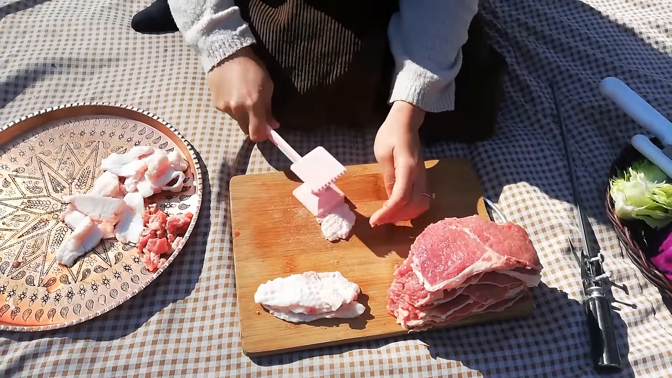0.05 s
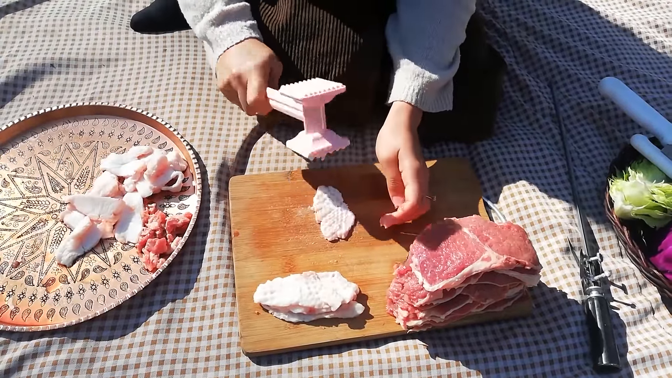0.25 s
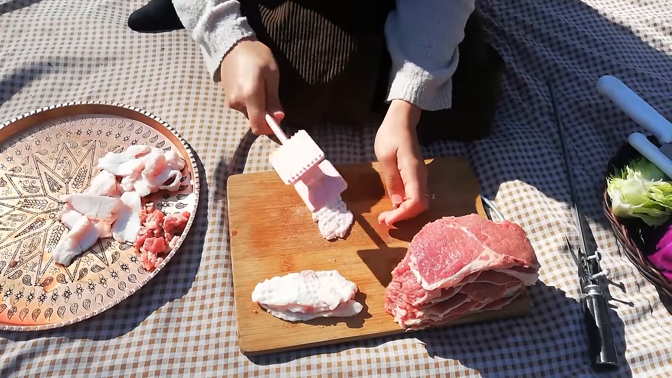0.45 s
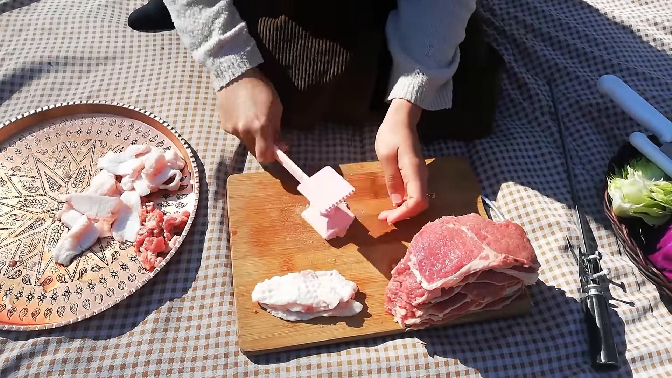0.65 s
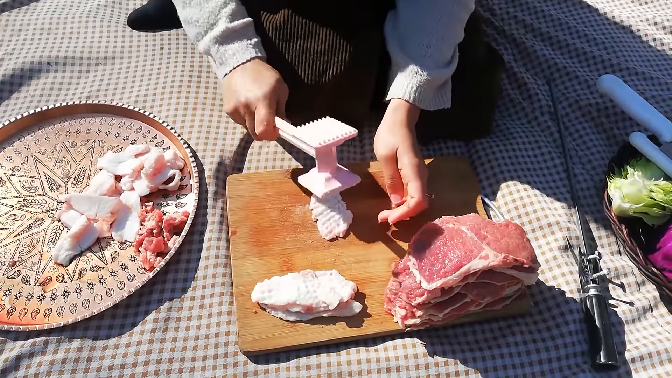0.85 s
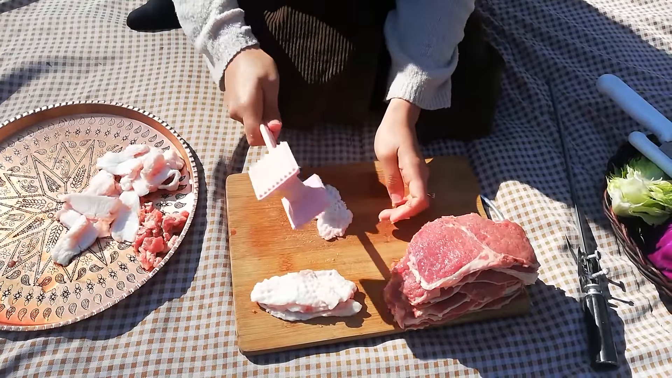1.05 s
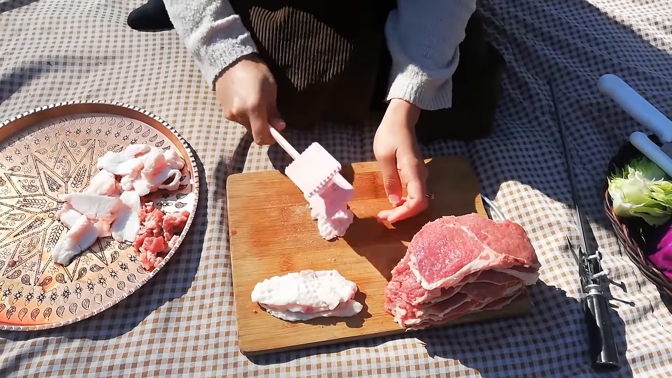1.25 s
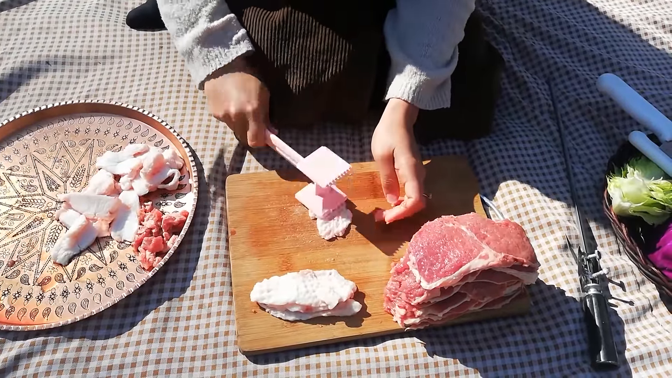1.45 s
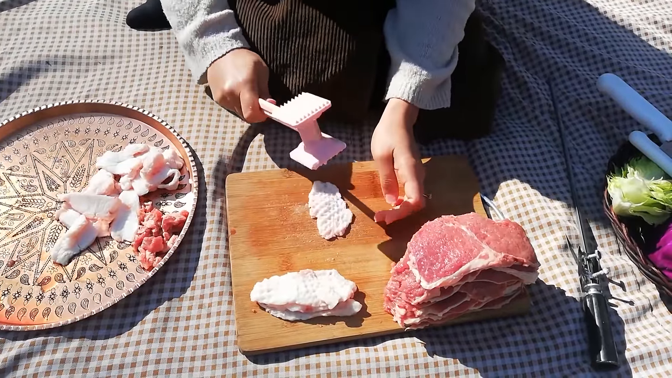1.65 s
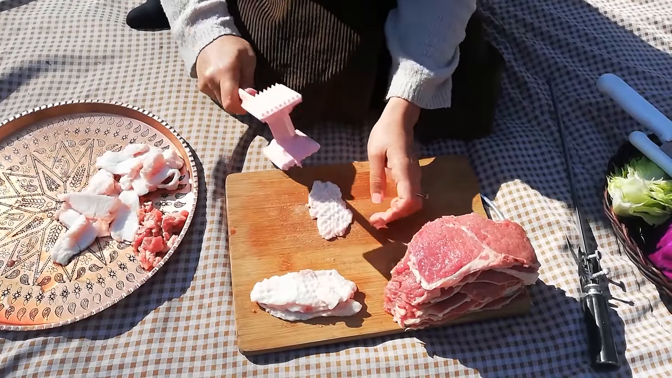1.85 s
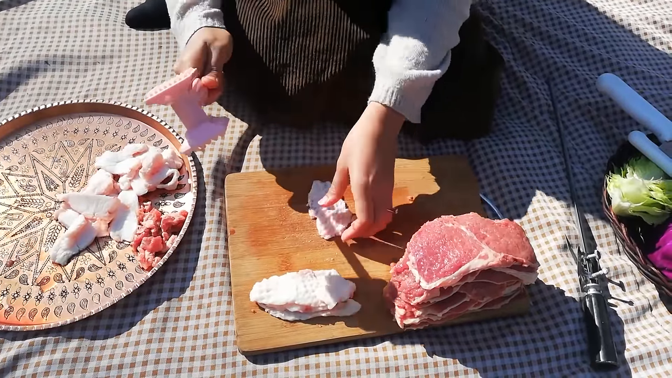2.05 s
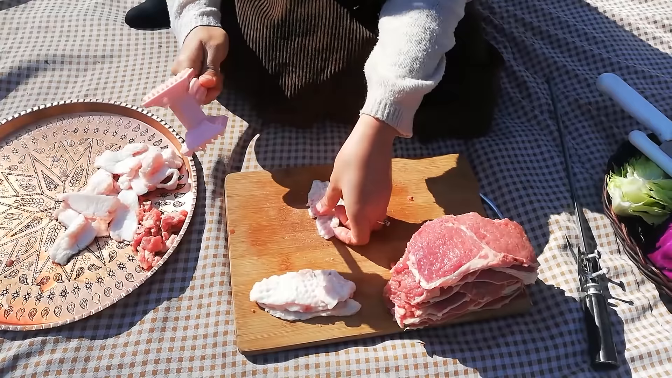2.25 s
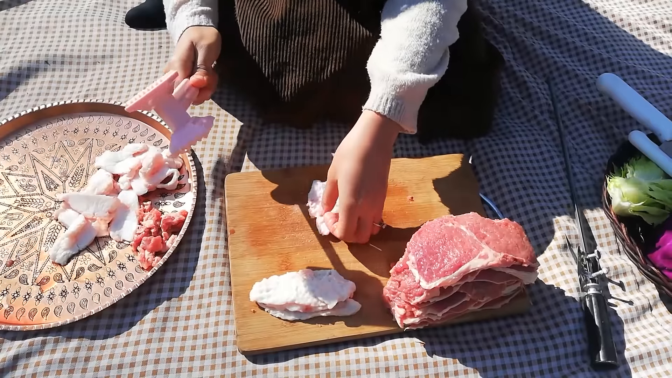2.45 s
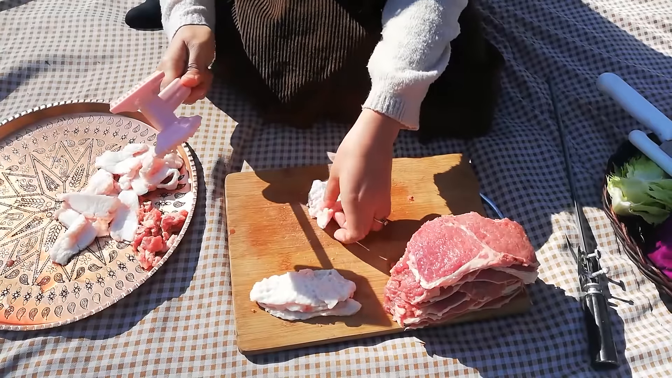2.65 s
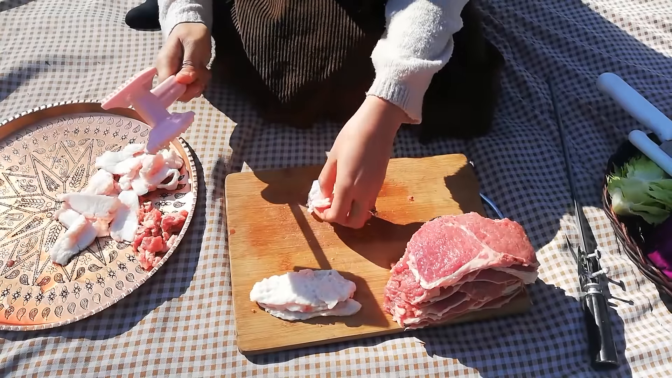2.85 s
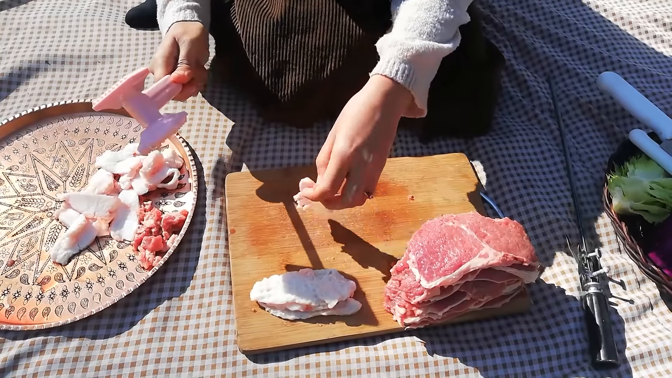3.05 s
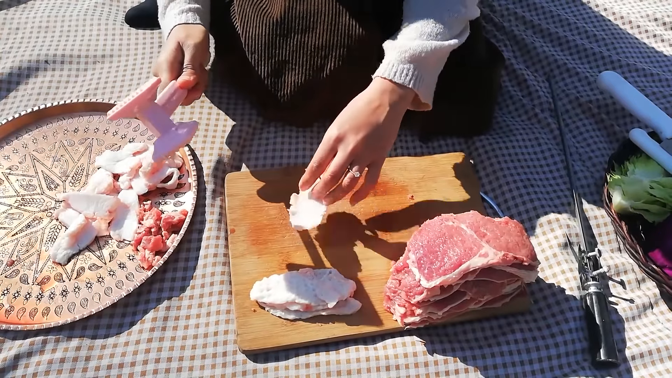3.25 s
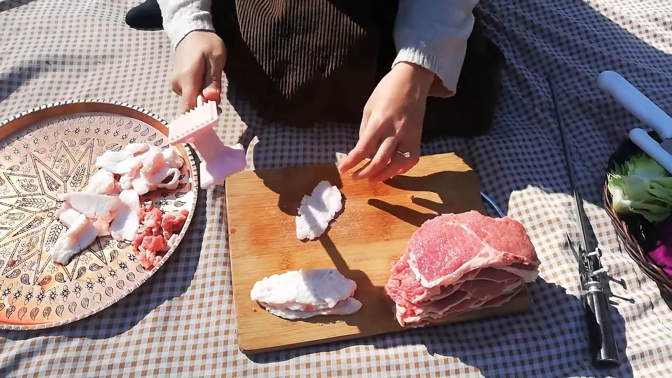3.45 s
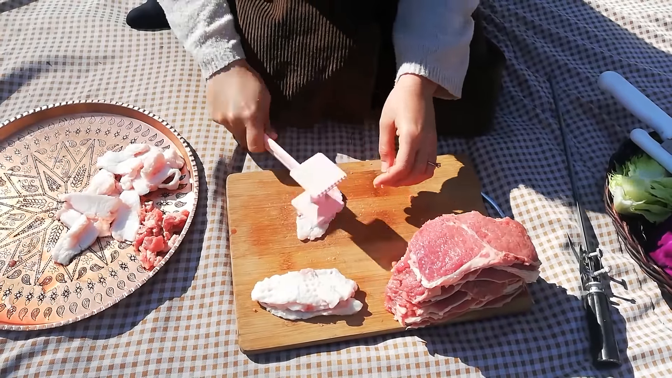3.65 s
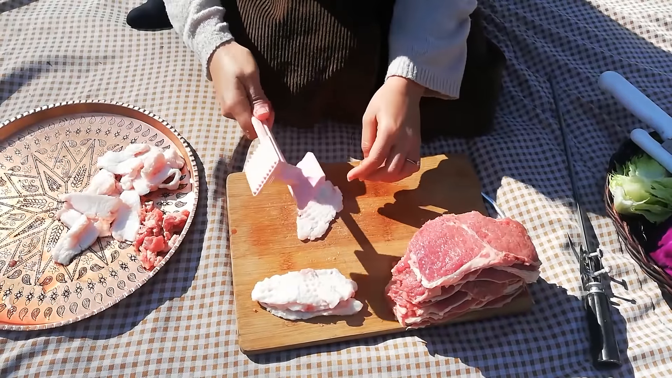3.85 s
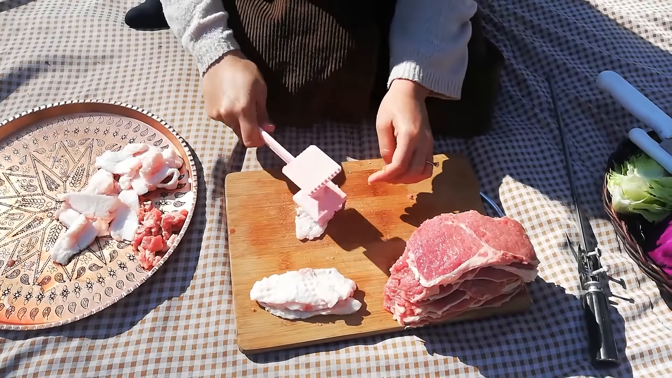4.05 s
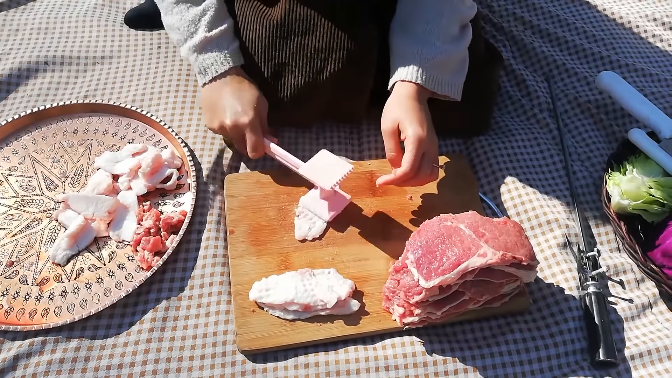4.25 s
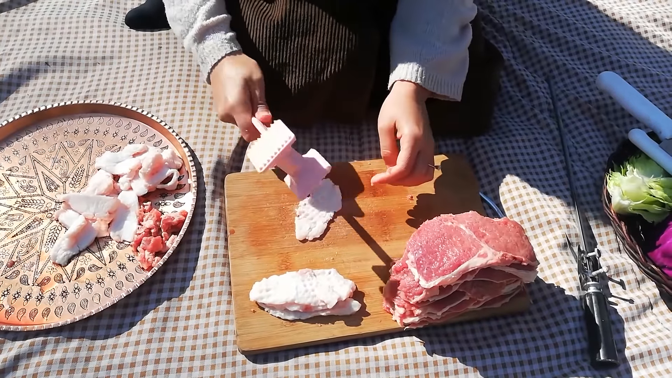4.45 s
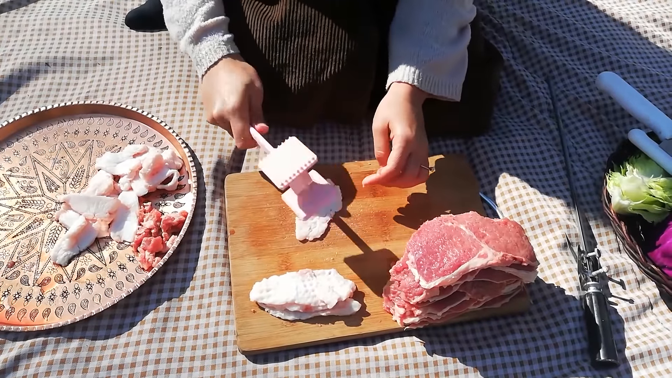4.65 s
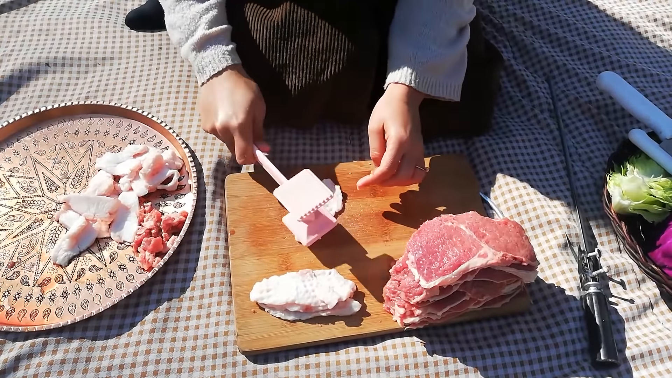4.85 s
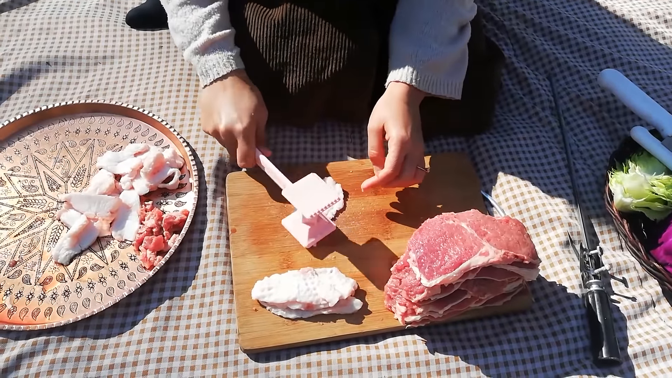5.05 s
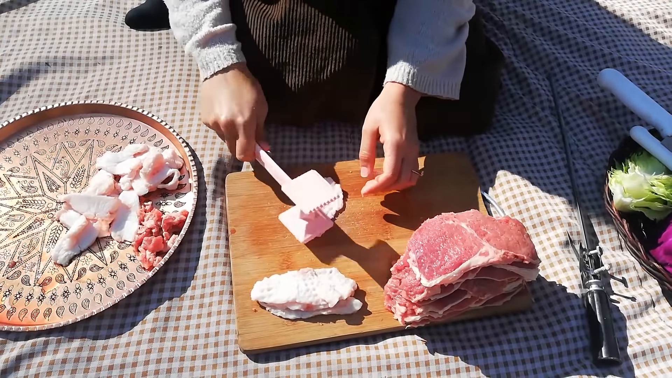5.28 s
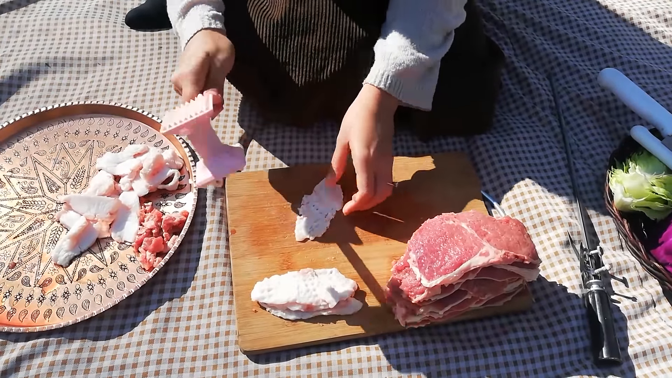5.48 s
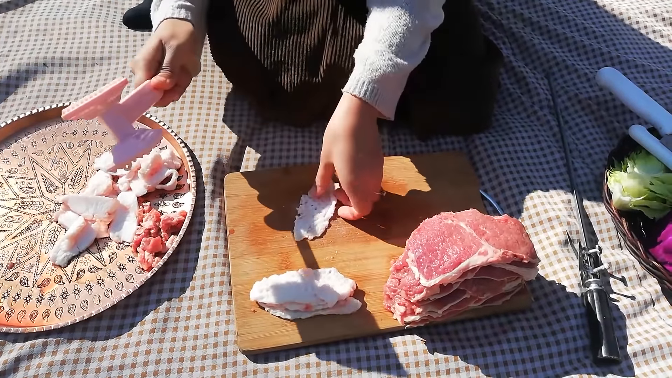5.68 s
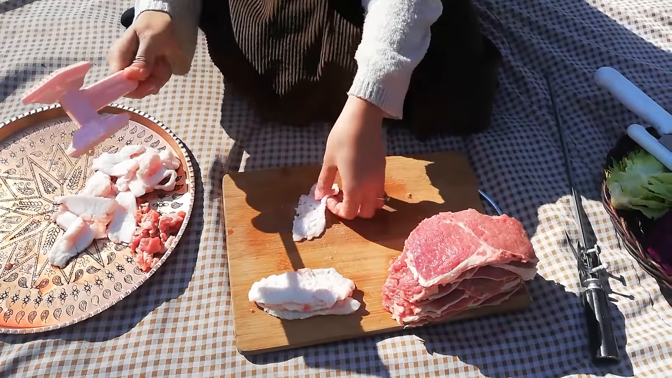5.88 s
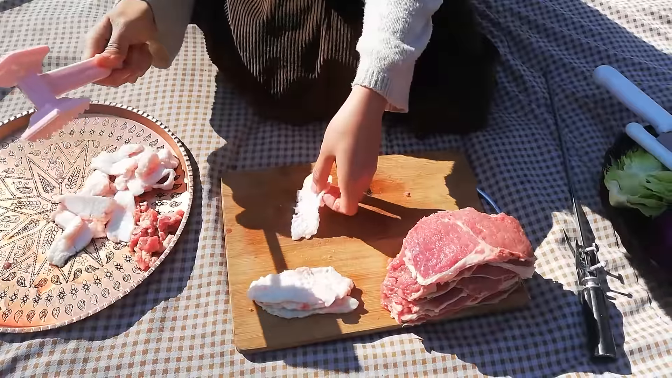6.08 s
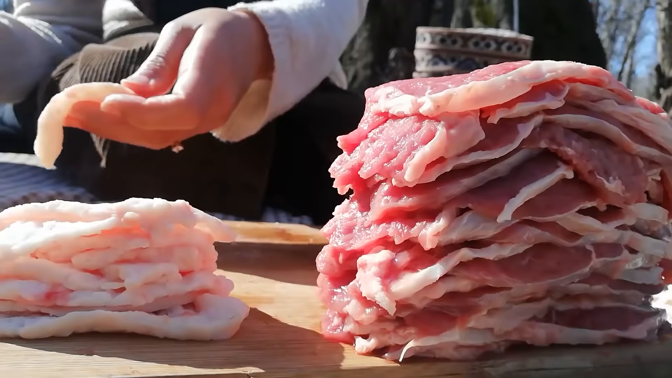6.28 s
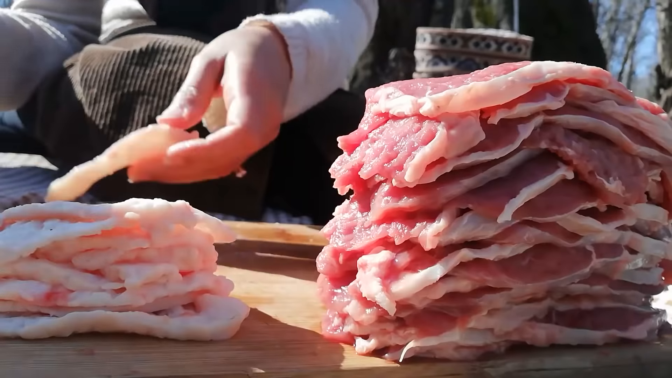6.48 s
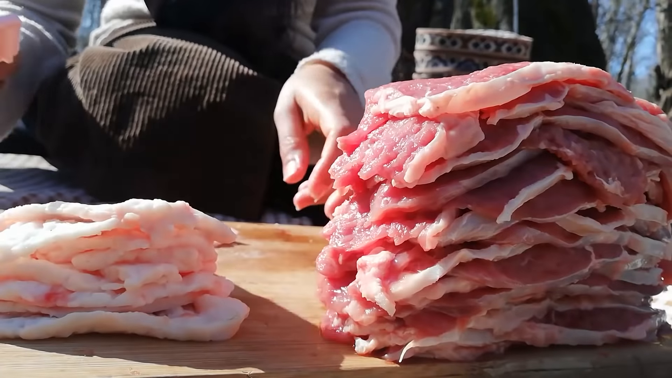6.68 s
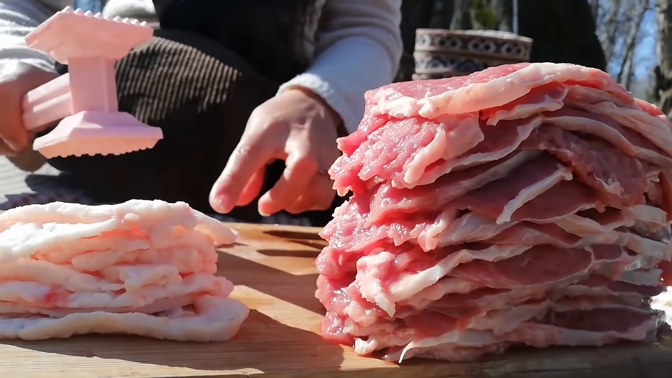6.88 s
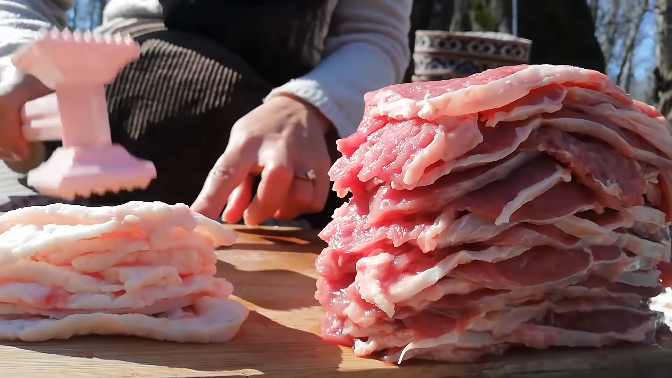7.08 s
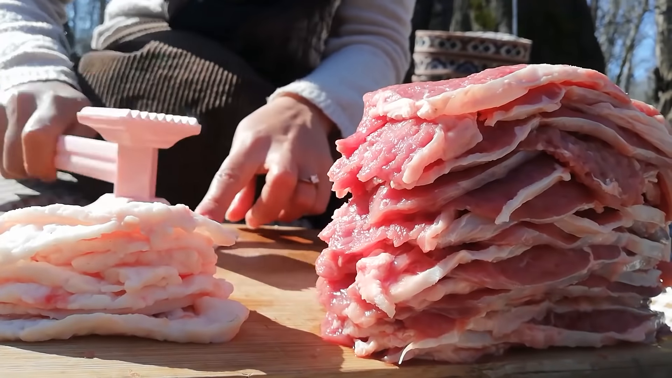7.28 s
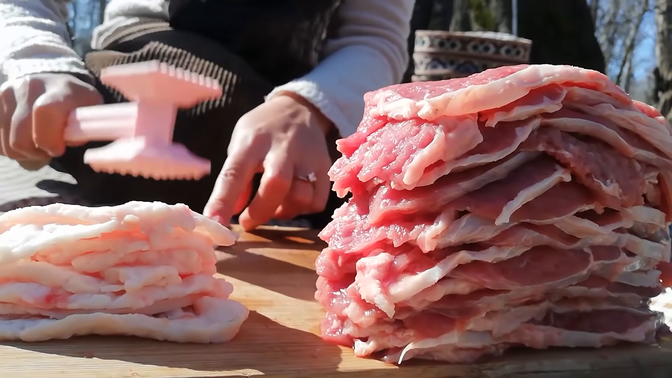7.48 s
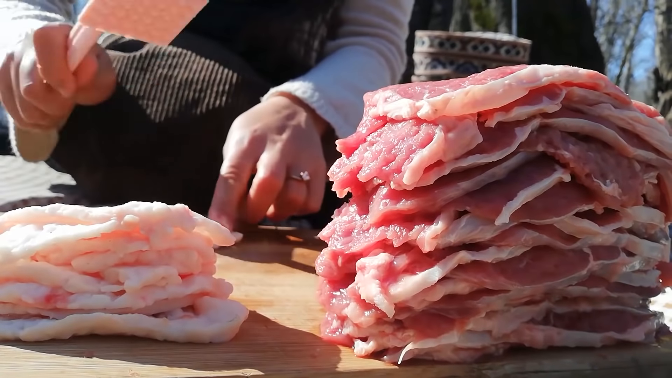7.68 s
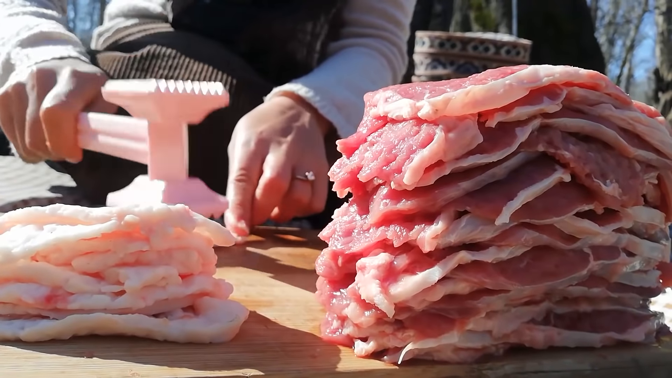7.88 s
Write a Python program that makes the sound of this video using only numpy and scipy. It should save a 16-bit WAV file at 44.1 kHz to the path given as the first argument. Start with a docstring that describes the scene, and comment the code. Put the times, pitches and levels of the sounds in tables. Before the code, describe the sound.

A toothed plastic mallet pounds thin slices of raw meat on a wooden board, close to the microphone outdoors. Seven quick, even blows mix dull, wet thuds with sharper wooden knocks. After a pause come seven more, then another pause and four slightly duller ones. Low wind rumble and hiss lie underneath, with a faint echo, faint dry ticking on the right and a barely audible bird near the end.

```python
"""A toothed plastic mallet pounds thin slices of meat on a wooden board on a blanket outdoors.
Each blow squashes the meat, then knocks through to the board and makes it ring. Trees return a
faint echo over low rumble and hiss; sticky meat peels off the teeth, and a far bird whistles.
A camera is close by: something in it, likely the lens motor, ticks faintly, and its compressor
turns the sound down after the hardest blows."""
import sys
import numpy as np
from scipy import signal
from scipy.fft import rfft, irfft
from scipy.io import wavfile
from scipy.ndimage import uniform_filter1d, minimum_filter1d

SR = 44100
rng = np.random.default_rng(int(sys.argv[2]) if len(sys.argv) > 2 else 0)


def dump(signal):
    """Clip the signal to [-1, 1] and save it as 16-bit WAV at the path in sys.argv[1]."""
    limited = np.clip(np.atleast_2d(signal).T, -1, 1)
    pcm = np.round(limited * 32767).astype(np.int16)
    wavfile.write(sys.argv[1], SR, pcm)


N = 349267


def undb(db):
    """Turn decibels into a number to multiply by."""
    return 10 ** (np.asarray(db) / 20)


def add(out, x, start_s):
    """Mix x into out from a given time."""
    i = int(round(start_s * SR))
    out[..., i:i + x.shape[-1]] += x[..., :max(N - i, 0)]


def colour(x, points):
    """Make each pitch louder or softer along a curve of (pitch_hz, level_db) points."""
    hz, db = np.transpose(points)
    f = np.fft.rfftfreq(x.shape[-1], 1 / SR)
    curve_db = np.interp(np.log(f + 1), np.log(hz), db)
    return irfft(rfft(x) * undb(curve_db), x.shape[-1])


def unit(x):
    """Scale to an energy of one."""
    return x / np.sqrt(np.sum(x ** 2))


def bump(hz, centre_hz, octaves):
    """A bell-shaped weight: one at the centre pitch, less to either side."""
    return np.exp(-(np.log2(hz / centre_hz) / octaves) ** 2)


def resonance(f, hz, ring_s):
    """How a ringing tone answers each frequency f; it fades by 60 dB in ring_s."""
    width_hz = np.log(1000) / (np.pi * ring_s)
    return 1 / (1 + 1j * (f ** 2 - hz ** 2) / (f * width_hz))


# the tone of open air and microphone hiss: pitch_hz, level_db
AIR_COLOUR = [(20, -10), (60, 3), (100, -1), (160, -10), (250, -17), (360, -27), (700, -29.5), (1500, -33),
              (4500, -36.5), (9000, -39), (16000, -46.5)]
# gusts that swell the rumble: peak_s, half_length_s, boost_db
GUSTS = [(.9, 0.048, 11.5), (1.3, 0.078, 12), (1.98, 0.2876, 6.5), (6.98, 0.19, 7.5), (7.696, .3, 4.5)]


def air(level_db=-30, hiss_right_db=1, calm_db=-2.5, flicker_db=3.5):
    """Low rumble, alike on both sides, swells with the gusts under a smooth hiss."""
    f = np.fft.rfftfreq(N, 1 / SR)
    likeness = .985 / (1 + (f / 800) ** 2)  # left and right agree less on high sounds
    shares = np.sqrt([(1 + likeness) / 2, (1 - likeness) / 2])
    mid, side = rfft(rng.standard_normal((2, N))) * shares
    noise = np.array([mid + side, mid - side])
    bass = 1 / (1 + (f / 170) ** 4)
    t = np.arange(N) / SR
    flicker = np.interp(t, np.linspace(0, t[-1], 100), rng.standard_normal(100))
    gusts_db = sum(db * np.exp(-((t - s) / half_s) ** 2) for s, half_s, db in GUSTS)
    rumble = irfft(noise * bass, N) * undb(calm_db + gusts_db + flicker_db * flicker)
    hiss = irfft(noise * (1 - bass), N) * undb([[-hiss_right_db], [hiss_right_db]])
    return undb(level_db) * colour(rumble + hiss, AIR_COLOUR)


# the tone of the meat's wet crackle: pitch_hz, level_db
SQUELCH_COLOUR = [(200, -14), (1000, 8), (2500, -6), (3800, 1), (5200, -2.5), (7000, -4.5), (10000, 0),
                  (12500, -7.5), (16000, -21)]


def squelch(size, contact_s, spread_s=.0012, lead_s=.00018, tail_s=.009, tail_db=-23):
    """Teeth burst through wet fibres: many tiny clicks around the moment of contact."""
    t = np.arange(size) / SR - contact_s
    burst = np.exp(-.5 * ((t + lead_s) / spread_s) ** 2)
    tail = undb(tail_db) * (t > 0) * np.exp(-abs(t) / tail_s)
    grains = rng.standard_normal(size) * undb(1.4 * rng.standard_normal(size))
    return unit(colour(grains * (burst + tail), SQUELCH_COLOUR))


# the ringing tones of the hollow plastic head: pitch_hz, ring_s, level_db
HEAD_TONES = [(3600, 0.0071, 3.5), (4535, .01, -4), (5880, 0.011, 2), (6293, .033, 4.5),
              (6900, 0.012, -1.5), (9060, 0.018, -11.5), (9870, .017, -14.5), (11900, 0.011, -15)]


def plastic_click(f, scatter_db=2):
    """Teeth that reach the wood ring the mallet head, a little differently each time."""
    hz, ring_s, db = np.transpose(HEAD_TONES)[:, :, None]
    gains = undb(db + scatter_db * rng.standard_normal(db.shape))
    return (gains * resonance(f, hz, ring_s)).sum(axis=0)


# the board's tones with the mallet resting on it: pitch_hz, ring_s, level_db, left_minus_right_db
BOARD_TONES = [ (174, .05, -6, 0.5), (232.7, 0.068, -1, 3), (322, 0.012, 0.5, 0),
               (596.2, 0.037, 10.5, -3.5), (669.5, 0.019, 11.5, -30), (965, 0.0084, 2, -25.5),
               (1124, 0.018, 3, -15.5), (1475, .016, 6.5, -10), (1596.5, .024, -0.5, -14.5),
               (2096, .028, -5, -18.5), (2265, 0.022, -5.5, -20)]


def board_ring(f, brightness_db, stacked, stack_db=-2, stack_sag=.31, stack_damping=1.45):
    """The board rings; a heavy stack of meat shortens all tones and weakens and lowers middle ones."""
    hz, ring_s, db, left_db = np.transpose(BOARD_TONES)[:, :, None]
    load = stacked * bump(hz, 542, .2)
    db = db + brightness_db * bump(hz, 1550, .39) + stack_db * load
    hz = hz * (1 - stack_sag * load) * (1 + .01 * rng.standard_normal(hz.shape))
    tones = undb(db) * resonance(f, hz, ring_s / stack_damping ** stacked)
    return np.array([(tones * undb(left_db)).sum(axis=0), tones.sum(axis=0)])


def blow(squash_db, squash_ms, knock_db, squelch_db, brightness_db, stacked, contact_s,
         knock_ms=.13, click_db=-21.5, size=8192):
    """A soft push through the meat and a short knock on the wood set the board ringing."""
    f = np.fft.rfftfreq(size, 1 / SR) + 1e-9
    radians_per_ms = 2 * np.pi * f / 1000
    delay = np.exp(-2j * np.pi * f * contact_s)
    squash = undb(squash_db) * np.exp(-.5 * (radians_per_ms * squash_ms) ** 2)
    knock = undb(knock_db) / (1 + (radians_per_ms * knock_ms) ** 2 / 2) ** 2
    bass_loss = 1j * f / (1j * f + 650)  # below 650 Hz the air slips round the board
    wood = -(squash + knock) * delay * bass_loss * board_ring(f, brightness_db, stacked)
    wet = undb(squelch_db) * rfft(squelch(size, contact_s))
    click = undb(knock_db + click_db) * delay * plastic_click(f)
    shade = undb([[-26], [0]])  # the left microphone is shielded from high sounds
    return irfft(wood + shade * (wet - click))


# mallet blows (the brightness comes from the spot that is struck):
# start_s, squash_db, squash_ms, knock_db, squelch_db, brightness_db
BLOWS = [ (0.0553, 40.5, .65, 12.5, -9, 3.5), (.3702, 35.5, .68, 29.5, -9, 0.5),
         (.6524, 40.5, .46, 4.5, -14.5, 0), (0.9349, 26, .4, 29.5, -3.5, -2), (1.2117, 40, .51, 9, -11, 5),
         (1.497, 39.5, .55, 8.5, -9.5, -9.5), (1.7676, 39, .51, 25, 6, -14.5),
         (3.687, 40, .63, 27.5, 0, -6.5), (3.9931, 39, 0.88, -12.5, -24.5, 2), (4.268, 42, .58, 3, -19, 2),
         (4.5498, 39.5, .65, 15.5, -23, 8), (4.8025, 28.5, .86, 31.5, -9.5, 4.5),
         (5.0492, 16, 1, 33.5, -0.5, 4.5), (5.312, 28.5, .45, 20, -57, 5), (6.989, 34, 1.1, -6, -21.5, -3),
         (7.002, 19, .6, -4.5, -35, -22), (7.2514, 36.5, .88, -4, -6.5, 19), (7.511, 37, .76, 3.5, -8, 9.5),
         (7.787, 32.5, .8, 7, -9.5, 10.5)]
# fingers and meat touch the board lightly: start_s, level_db, contact_ms
TOUCHES = [(3.33, -13, 0.4), (6.356, -1.5, 0.61), (6.568, -6, 0.23), (7.873, 1.5, 0.6)]


def pounding(reaches_wood_db=20, bounce_s=.017, stack_from_s=6.2, run_up_s=.02):
    """Blows and light touches; a blow cushioned by the meat lands again, softly and with no knock."""
    silent = -np.inf
    bounces = []
    for start_s, squash_db, squash_ms, knock_db, squelch_db, _ in BLOWS:
        if knock_db < reaches_wood_db:
            again_s = start_s + bounce_s * rng.uniform(.71, 1.3)
            bounces.append((again_s, squash_db - 25.5, squash_ms * .78, silent, squelch_db - 21, 0))
    touches = [(start_s, db, ms, silent, silent, 0) for start_s, db, ms in TOUCHES]
    out = np.zeros((2, N))
    for start_s, *stroke in BLOWS + bounces + touches:
        stacked = float(start_s > stack_from_s)  # 1 once the board carries a tall stack of slices
        add(out, blow(*stroke, stacked, run_up_s), start_s - run_up_s)
    return out


# the tone of the echo: pitch_hz, level_db
ECHO_COLOUR = [(80, -18), (250, -5), (420, -5), (600, -10.5), (1000, -10.5), (1370, -0.5), (1700, -11.5),
               (2400, -3), (3300, -14), (8000, -15.5), (16000, -31)]


def echo(x, near_db=-28, near_fade_s=.08, far_db=-31, far_fade_s=.62, left_db=-8):
    """Things nearby scatter the blows at once; tree trunks return a long, faint tail."""
    t = np.arange(SR) / SR
    rise = 1 - np.exp(-t / .013)
    near = undb(near_db) * unit(rise * undb(-60 * t / near_fade_s))
    far = undb(far_db) * unit(rise * undb(-60 * t / far_fade_s))
    reflections = colour(rng.standard_normal((2, SR)), ECHO_COLOUR) * (near + far)
    return signal.fftconvolve(x[None], reflections, axes=1)[:, :N] * undb([[left_db], [0]])


# runs of faint ticks: start_s, stop_s
TICK_RUNS = [(0.289, .33), (.77, 0.94), (1.22, 1.29), (1.93, 7.9)]
# the ticks within one cycle: offset_s, level_db
TICK_PATTERN = [(0, 3.5), (.005, -4.5), (0.015, -2.5), (.033, -0.5), (.04, 0), (.045, -0.5)]
# the tone of a tick: pitch_hz, level_db
TICK_COLOUR = [(100, -45), (4500, -16.5), (6500, 1), (8000, 9.5), (9500, 7.5), (11000, -7.5),
               (16000, -10.5)]


def ticks(level_db=-41.5, scatter_db=1.4, chance=.69, cycle_s=.08, jitter_s=.00029):
    """Dry ticks on the right, likely a lens motor, in a quick limping cycle with some left out."""
    right = np.zeros(N)
    for start_s, stop_s in TICK_RUNS:
        for cycle_start_s in np.arange(start_s, stop_s, cycle_s):
            for offset_s, db in TICK_PATTERN:
                click = rng.standard_normal(128) * np.exp(-np.arange(128) / SR / .00025)
                gain = undb(level_db + db + scatter_db * rng.standard_normal())
                sounds = rng.random() < chance
                tick_s = cycle_start_s + offset_s + jitter_s * rng.standard_normal()
                add(right, sounds * gain * unit(colour(click, TICK_COLOUR)), tick_s)
    return np.array([np.zeros(N), right])


# meat peels off the teeth: start_s, length_s, level_db
PEELS = [(3.852, 0.11, -60), (6.444, 0.11, -65.5)]


def peeling(left_db=-10):
    """Sticky meat lets go with a short, fine crackle."""
    tone = [(300, 2), (2000, -4), (3700, 6), (6000, -11), (14000, -20)]  # pitch_hz, level_db
    out = np.zeros(N)
    for start_s, length_s, db in PEELS:
        fade = np.linspace(1, 0, int(length_s * SR))
        grains = rng.standard_normal(len(fade)) * undb(6.1 * rng.standard_normal(len(fade)))
        add(out, undb(db) * fade * colour(grains, tone), start_s)
    return out * undb([[left_db], [0]])


# a far bird's whistles: start_s, length_s, pitch_hz, level_db
WHISTLES = [(6.309, 0.17, 4480, -80.5), (6.648, 0.24, 4500, -78.5), (7.15, 0.23, 4480, -78.5)]


def bird(waver_db=4.6, pitch_waver=.00724):
    """A far bird whistles thinly, its pitch and loudness wavering together."""
    out = np.zeros(N)
    for start_s, length_s, hz, db in WHISTLES:
        size = int(length_s * SR)
        waver = np.interp(np.arange(size), np.linspace(0, size, 16), rng.standard_normal(16))
        loudness = undb(db + waver_db * waver) * signal.windows.tukey(size, .5)
        phase = 2 * np.pi * np.cumsum(hz * (1 + pitch_waver * waver)) / SR
        add(out, loudness * np.sin(phase), start_s)
    return out


def scene():
    """The pounding and its echo, with the quiet sounds around them."""
    board = pounding()
    return board + echo(board[1]) + peeling() + bird() + ticks() + air()


def record(dry, threshold_db=-10, ratio=1.416, release_db_per_s=26, left_lag_s=.00059, top_hz=16000):
    """A compressor turns loud peaks down and recovers slowly; the left side lags; top treble is cut."""
    peak_db = 20 * np.log10(abs(dry).max(axis=0) + 1e-9)
    cut_db = np.maximum(peak_db - threshold_db, 0) * (1 - 1 / ratio)
    recovery_db = release_db_per_s * np.arange(N) / SR
    gain_db = recovery_db - np.maximum.accumulate(cut_db + recovery_db)
    # start turning down just before each peak
    gain_db = uniform_filter1d(minimum_filter1d(gain_db, size=300), size=300)
    left, right = np.clip(dry * undb(gain_db), -.95, .95)
    left = np.pad(left, (round(left_lag_s * SR), 0))[:N]
    treble_cut = signal.ellip(8, .2, 70, top_hz, fs=SR, output="sos")
    return signal.sosfilt(treble_cut, np.array([left, right]))


dry = scene()
out = record(dry)
dump(out)
```